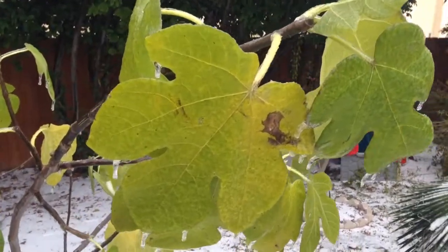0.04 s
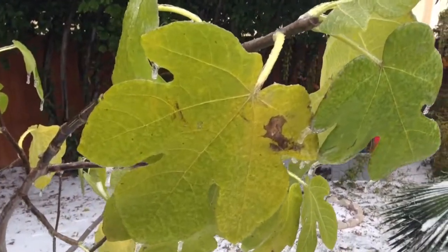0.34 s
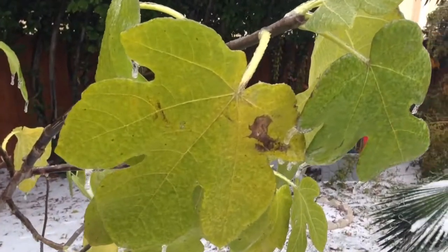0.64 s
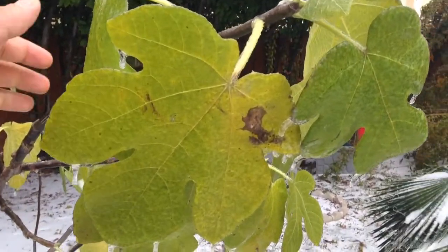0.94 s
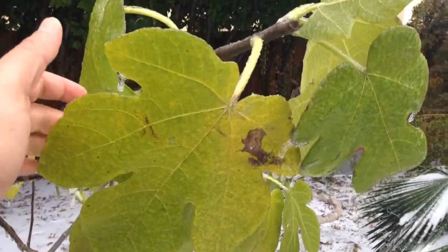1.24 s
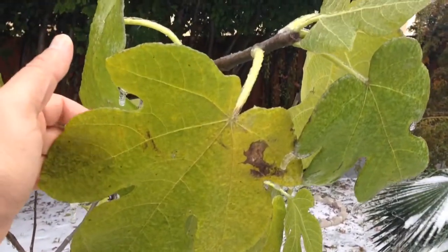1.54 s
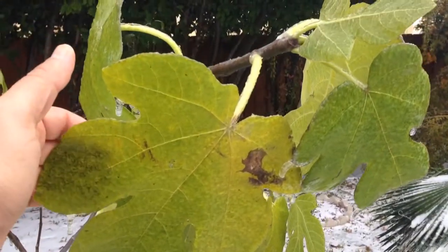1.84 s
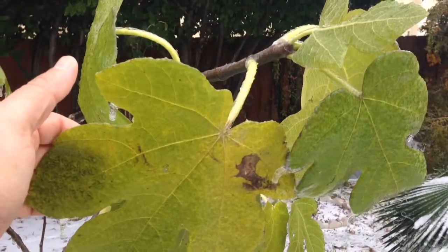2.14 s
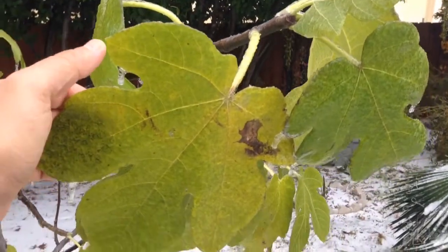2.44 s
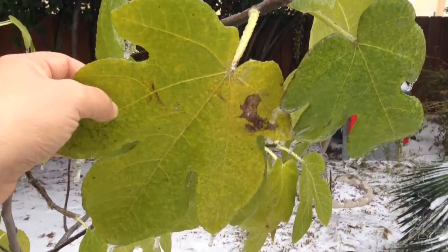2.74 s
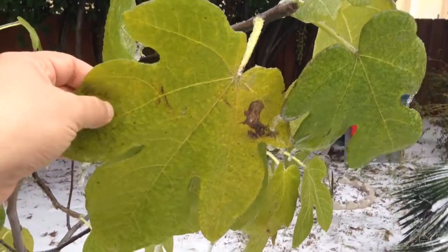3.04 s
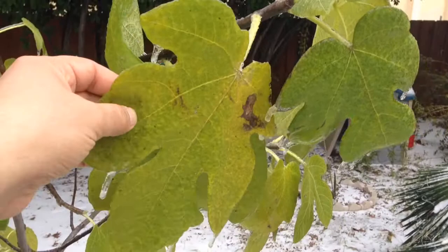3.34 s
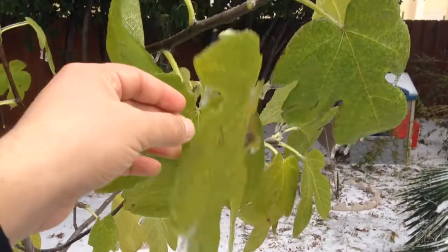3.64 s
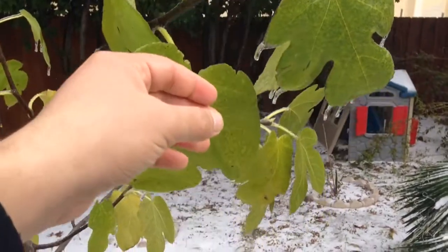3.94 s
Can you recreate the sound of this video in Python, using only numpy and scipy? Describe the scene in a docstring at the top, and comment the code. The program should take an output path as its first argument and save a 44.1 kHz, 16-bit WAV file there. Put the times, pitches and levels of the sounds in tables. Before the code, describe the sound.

A frozen leaf crackles close up as a hand bends it. At first there are only faint ticks and sleeve rustle over a quiet outdoor hiss and distant traffic. Sharp little cracks begin around 1.5 seconds, thickening from 2.1 seconds into brittle flurries with frosty crunching and soft flaps. A dense burst of cracks comes near 3.7 seconds, and the stalk snaps with a duller knock at 3.8.

```python
"""A frozen leaf crackles close up as a hand squeezes and bends it, outdoors in the cold.
Its ice glaze breaks in brittle cracks that ring the stiff blade, fine frost crunches under the fingers,
and the blade buckles with soft flaps. At the end the stalk snaps with a duller knock.
Underneath lie far traffic, an engine drone, a faint hiss of air, sleeve rustle and low handling bumps."""
import sys
import numpy as np
from scipy import signal
from scipy.fft import rfft, irfft
from scipy.io import wavfile

SR = 44100
rng = np.random.default_rng(int(sys.argv[2]) if len(sys.argv) > 2 else 0)


def generate_wav(sig):
    """Save sig (samples, or channels by samples) to the path in sys.argv[1] as 16-bit PCM at SR."""
    pcm = np.round(np.clip(np.atleast_2d(sig).T, -1, 1) * 32767).astype(np.int16)
    wavfile.write(sys.argv[1], SR, pcm)


N = 176400
CRACK_ATTACK_S = 0.0015


def amp(db):
    return 10 ** (np.asarray(db) / 20)


def along(points, hz):
    """Read (Hz, value) points on a log frequency axis."""
    point_hz, values = np.transpose(points)
    return np.interp(np.log(hz + 1), np.log(point_hz + 1), values)


def envelope(points):
    """A gain for every sample from (seconds, dB) points."""
    return amp(np.interp(np.arange(N) / SR, *np.transpose(points)))


def minimum_phase(gain, size):
    """A filter response with the given gain and no pre-ring."""
    cepstrum = irfft(np.log(np.maximum(gain, 1e-6)), size)
    cepstrum[1:size // 2] *= 2
    cepstrum[size // 2 + 1:] = 0
    return np.exp(rfft(cepstrum))


def coloured(x, tone):
    """x through an EQ curve of (Hz, dB) points, at rms 1."""
    shaped = irfft(rfft(x) * amp(along(tone, np.fft.rfftfreq(N, 1 / SR))), N)
    return shaped / np.sqrt(np.mean(shaped ** 2) + 1e-20)


def add(track, start_s, sound):
    """Mix a sound into the track."""
    part = track[max(0, round(start_s * SR)):][:len(sound)]
    part += sound[:len(part)]


def strength(x):
    """Rms of a short sound as if it lasted 5 ms."""
    return np.sqrt(np.sum(x ** 2) / (.005 * SR) + 1e-20)


def traffic():
    """Far traffic: a low rumble that slowly swells and eases."""
    # The rumble's swell. Each row: time in seconds, level in dB.
    levels = [(0, -63.5), (.6, -61.5), (.7, -56.5), (1.3, -55), (2.1, -53), (2.3, -59), (2.65, -58),
              (2.9, -60), (4, -57.5)]
    # Its bass-heavy tone. Each row: frequency in Hz, gain in dB.
    tone = [(20, -21), (50, -7.5), (75, -2.5), (105, -5), (165, 3.5), (210, -2.5), (280, -6), (450, -18.5),
            (900, -55), (3000, -80)]
    return envelope(levels) * coloured(rng.standard_normal(N), tone)


def engine():
    """A far engine drones in a narrow band of low noise."""
    # The drone's rise and fall. Each row: time in seconds, level in dB.
    levels = [(0, -67), (.6, -73), (.7, -51.5), (.9, -61.5), (1.05, -61.5), (1.35, -58.5), (1.55, -64.5),
              (1.75, -56), (2.15, -51), (2.3, -64), (2.6, -70), (2.9, -61), (4, -69.5)]
    # Its single hump. Each row: frequency in Hz, gain in dB.
    tone = [(60, -42), (125, -16.5), (163, -2), (195, -6), (260, -35.5), (500, -57)]
    return envelope(levels) * coloured(rng.standard_normal(N), tone)


def air():
    """The air hisses, faint and nearly steady."""
    # The drift of the hiss. Each row: time in seconds, level in dB.
    levels = [(0, -58), (.15, -59.5), (.5, -60), (.7, -61.5), (.85, -62), (1.3, -62), (1.7, -61),
              (2.1, -62), (3.6, -61), (4, -60.5)]
    # Its soft-topped tone. Each row: frequency in Hz, gain in dB.
    tone = [(240, 0), (400, -8), (602, -3.5), (1590, -10), (1770, -11), (2870, -12), (15000, -19.5)]
    return envelope(levels) * coloured(rng.standard_normal(N), tone)


def grains(tone, per_s, spread_db=2, t60=0.033):
    """Overlapping tiny noise bursts of random size, at rms 1."""
    onsets = rng.random(N) < per_s / SR
    energy = onsets * amp(spread_db * rng.standard_normal(N)) ** 2
    power = signal.lfilter([1], [1, -amp(-60 / (t60 * SR)) ** 2], energy)
    return coloured(np.sqrt(np.abs(power)) * rng.standard_normal(N), tone)


def rustle():
    """Hand and sleeve rustle in soft grains, reaching for the leaf."""
    # The hand's movement. Each row: time in seconds, level in dB.
    levels = [(0, -70), (.02, -49), (.032, -49), (.07, -56), (.12, -57), (.19, -74), (.3, -65), (.38, -64),
              (.5, -60), (.62, -61.5), (.7, -58), (.82, -68), (1.4, -76), (1.58, -62), (1.65, -62),
              (1.76, -61), (2, -108), (4, -78)]
    # The sleeve's tone. Each row: frequency in Hz, gain in dB.
    tone = [(150, 12), (600, -7), (2000, -6.5), (3300, -3), (5500, -4.5), (9000, -11.5), (15000, -17)]
    return envelope(levels) * grains(tone, per_s=450)


def volley(tone, t60, size=4096):
    """A fast-dying volley of tiny ruptures whose lows linger."""
    crossover_hz, low_attack_s, low_linger = 1620, 0.00042, 3.35
    high_hold_s, spikiness = 0.00061, 0.15
    t, hz = np.arange(size) / SR, np.fft.rfftfreq(size, 1 / SR)
    ruptures = rng.standard_normal((2, size)) * np.exp(spikiness * rng.standard_normal(size))
    high_decay = amp(-60 * np.maximum(t - high_hold_s, 0) / t60)
    high = ruptures[0] * (1 - np.exp(-t / CRACK_ATTACK_S)) * high_decay
    low = ruptures[1] * (1 - np.exp(-t / low_attack_s)) * amp(-60 * t / (t60 * low_linger))
    low_share = 1 / (1 + (hz / crossover_hz) ** 4)
    spectrum = 0
    for band, share in ((low, low_share), (high, 1 - low_share)):
        eq = minimum_phase(np.sqrt(share) * amp(along(tone, hz)), size)
        spectrum += rfft(band / strength(band)) * eq
    burst = irfft(spectrum)
    return burst / strength(burst)


def fracture(tone, modes, t60, ring_db, detune, size=4096):
    """A break: a volley of ruptures and the modes it rings, each at a slightly random pitch and level."""
    t = np.arange(size) / SR
    mode_hz, mode_db, mode_t60 = np.transpose(modes)[:, :, None]
    pitch_jitter, level_jitter, phase = rng.standard_normal((3, len(modes), 1))
    decays = amp(mode_db + 2.6 * level_jitter - 60 * t / mode_t60)
    partials = np.sin(2 * np.pi * (mode_hz * (1 + detune * pitch_jitter) * t + phase))
    ring = np.sum(decays * partials, axis=0) * (1 - np.exp(-t / CRACK_ATTACK_S))
    sound = volley(tone, t60) + amp(ring_db) * ring / strength(ring)
    return sound / strength(sound)


def crack(body_db, treble_db, body_hz=2160, treble_hz=6470):
    """One crack of ice rings the blade, its body and treble set against the mids."""
    # The bright tone of breaking ice. Each row: frequency in Hz, gain in dB.
    tone = [(100, -20.5), (220, -2.5), (450, -18), (750, -4), (1000, 0.5), (1200, -3), (1700, 1),
            (2700, -4), (3300, 7), (5500, 3.5), (9000, 1), (12000, -1.5), (15000, -3)]
    # The stiff blade's modes. Each row: frequency in Hz, level in dB, t60 in seconds.
    modes = [(767, -17.5, 0.027), (1009, -18.5, 0.033), (1734, -19, 0.055), (2363, -11.5, 0.04),
             (3070, -1, 0.017), (3368, -18, 0.061), (3660, -8, 0.026), (4800, -10.5, 0.039),
             (6680, -23, 0.0095), (8620, -4, 0.0073), (11020, -4.5, 0.0059)]
    sound = fracture(tone, modes, t60=0.015, ring_db=-6, detune=0.0465)  # bending shifts the modes
    spectrum, hz = rfft(sound), np.fft.rfftfreq(len(sound), 1 / SR)
    body, below_treble = (1 / (1 + (hz / edge) ** 8) for edge in (body_hz, treble_hz))
    log_gain = 0
    for share, db in ((body, body_db), (below_treble - body, 0), (1 - below_treble, treble_db)):
        band = irfft(spectrum * np.sqrt(np.abs(share)))
        log_gain += share * np.log(amp(db) / strength(band))
    return irfft(spectrum * minimum_phase(np.exp(log_gain), len(sound)))


def glaze(trim_db=-4):
    """The ice glaze cracks as the leaf bends: a few stray clicks, then flurries."""
    # The cracks. Each row: start in seconds, level of the mids in dB before the trim,
    # body over the mids in dB, treble over the mids in dB.
    cracks = [(0.0283, -41, -9, -5), (0.047, -45.5, -21, -6.5), (0.4235, -54, -10, -1),
              (0.4879, -48.5, -3, -10.5), (1.467, -40, -24, 2), (1.4714, -33.5, -17, 1),
              (1.4867, -43, -11, 6), (1.5494, -49, -17, -0.5), (1.6168, -53, -3, -7),
              (1.639, -51.5, -27, -7), (1.7176, -55, 0, 3), (1.7839, -32, -20.5, -0.5),
              (1.8312, -29.5, -9.5, 3.5), (1.8468, -27, -14, 5), (1.8774, -43.5, -23, -10),
              (1.9228, -48.5, -9, 11.5), (1.962, -58, -2, 7), (1.9748, -43, -24, 6.5),
              (2.1387, -46, -15, -1), (2.1524, -22.5, -10.5, 0), (2.1686, -26.5, -19, 9),
              (2.1716, -17.5, -6.5, -3), (2.1762, -23, -5.5, 10), (2.2664, -30, -6, 6),
              (2.3027, -27.5, -11, 5.5), (2.3125, -42.5, 5, 12), (2.3188, -27, -3.5, 5),
              (2.3446, -33, -10.5, 4), (2.3729, -40, -13, 7.5), (2.3917, -25.5, -9.5, 1.5),
              (2.418, -44.5, -13, 7), (2.4464, -47.5, -24, 7), (2.4749, -40.5, -18, 2.5),
              (2.4836, -38, -23, 4), (2.4919, -40, -16, 4), (2.507, -46.5, -18, 12), (2.5343, -45.5, -8, 5),
              (2.56, -46, -20, 10), (2.567, -47, -12, 8), (2.5783, -26.5, -15.5, 4.5),
              (2.615, -51, -14, 13.5), (2.6475, -42.5, -23, 1.5), (2.6547, -49, -27, 12.5),
              (2.6673, -49, -23, 8), (2.7032, -34.5, -17.5, 8), (2.7493, -49, -25, 6),
              (2.7822, -50.5, -9, 9), (2.7994, -20, -8, 0.5), (2.858, -44.5, 0.5, 3), (2.872, -46, -13, 11),
              (2.9231, -45.5, -19, 11), (2.929, -32.5, -17.5, 5.5), (3.003, -48.5, -15, 4),
              (3.0194, -29, -16, 2), (3.0326, -40.5, -11, 2), (3.103, -44, -20, 2), (3.146, -41, -1.5, 8),
              (3.1794, -33.5, -10, 8), (3.221, -22.5, -2.5, 0), (3.4318, -18.5, -11.5, -8),
              (3.4508, -40, -8, 2), (3.5053, -27, -18, 1.5), (3.612, -34, -16, 3), (3.6284, -34, -9.5, -3),
              (3.6436, -34, -1, 0), (3.6688, -24, -3.5, 5), (3.6754, -17.5, -15, -5),
              (3.6805, -17.5, -15, -7.5), (3.6847, -21.5, -10, -15), (3.6886, -22.5, -22, -1),
              (3.6914, -28.5, -4, 7), (3.6986, -24.5, -9.5, -2), (3.8355, -45.5, 3, 0.5)]
    out = np.zeros(N)
    for start, db, body_db, treble_db in cracks:
        add(out, start, amp(db + trim_db) * crack(body_db, treble_db))
    return out


def handling_bumps(width_s=0.033):
    """Handling makes soft, short swells of bass."""
    # The bumps. Each row: centre in seconds, level in dB.
    bumps = [(.16, -53), (.37, -53), (.5, -53), (2.54, -55)]
    # Their deep tone. Each row: frequency in Hz, gain in dB.
    tone = [(20, -9), (50, 19), (85, 12), (140, -1), (400, -63)]
    t = np.arange(N) / SR
    swells = sum(amp(db) * np.exp(-((t - centre) / width_s) ** 2) for centre, db in bumps)
    return swells * coloured(rng.standard_normal(N), tone)


def ticks(count=2, window_s=(1.9, 2), level_db=-62.5, spread_db=6):
    """The held leaf gives faint cracks at random moments."""
    out = np.zeros(N)
    for _ in range(count):
        start = rng.uniform(*window_s)
        gain = amp(level_db + spread_db * rng.normal())
        add(out, start, gain * crack(body_db=-6, treble_db=-3.5))
    return out


def frost_crunch(trim_db=-4):
    """Dense grains of frost, louder as the fingers press and slide."""
    # The squeezes. Each row: time in seconds, level in dB before the trim.
    levels = [(2.165, -79), (2.2, -39), (2.28, -41), (2.345, -35.5), (2.365, -57), (2.44, -59), (2.76, -59),
              (2.85, -51), (2.9, -57), (3.135, -56.5), (3.155, -40.5), (3.21, -38), (3.26, -48.5),
              (3.38, -51.5), (3.41, -54), (3.495, -47), (3.55, -52.5), (3.6, -60), (3.65, -40.5),
              (3.705, -29), (3.73, -62), (3.78, -68), (3.85, -74)]
    # The frost's crisp tone. Each row: frequency in Hz, gain in dB.
    tone = [(150, -28), (500, -5), (850, -20), (1200, -10.5), (2500, -3.5), (3300, -1), (5000, -0.5),
            (7000, -1.5), (12000, -0.5), (15000, -8.5)]
    return amp(trim_db) * envelope(levels) * grains(tone, per_s=1200)


def blade_flaps():
    """The blade buckles with a soft flap under some of the biggest cracks."""
    # The buckles. Each row: start in seconds, level in dB.
    flaps = [(2.17, -48), (2.799, -44), (3.223, -40.5), (3.432, -48)]
    # Their low, muffled tone. Each row: frequency in Hz, gain in dB.
    tone = [(80, -22), (180, 12), (320, 13.5), (600, 6.5), (1000, -6), (2500, -38)]
    out = np.zeros(N)
    for start, db in flaps:
        add(out, start, amp(db) * volley(tone, t60=0.021))
    return out


def stalk_snap():
    """The frozen stalk breaks in four quick steps that merge into a knock."""
    # The fibres giving way. Each row: start in seconds, level in dB.
    snaps = [(3.7934, -21.5), (3.8015, -31.5), (3.8095, -28), (3.8171, -37.5)]
    # The break's duller tone. Each row: frequency in Hz, gain in dB.
    tone = [(100, -15.5), (250, -11.5), (520, -13.5), (1000, 3), (1500, -6.5), (2100, -10), (4000, -8),
            (5500, -22.5), (9000, -28), (15000, -36)]
    # The stalk's modes. Each row: frequency in Hz, level in dB, t60 in seconds.
    modes = [(525, -4.5, 0.089), (913, -1, 0.044), (1469, 9, 0.029), (1715, 2, 0.062), (2500, 1, 0.044),
             (3920, -7.5, 0.057)]
    out = np.zeros(N)
    for start, db in snaps:
        add(out, start, amp(db) * fracture(tone, modes, t60=0.018, ring_db=-3.5, detune=0.0061))
    return out


def echoes(x, t60, pieces=20):
    """Scattered reflections, with a fresh tail for each stretch of sound as hand and leaves move."""
    t, out = np.arange(SR // 3) / SR, np.zeros(N)
    fade_in = 1 - np.exp(-(t / 0.01) ** 2)
    for k, piece in enumerate(np.array_split(x, pieces)):
        tail = rng.standard_normal(len(t)) * amp(-60 * t / t60) * fade_in
        add(out, k * N / pieces / SR, signal.fftconvolve(piece, tail / np.linalg.norm(tail)))
    return out


def scene():
    """The leaf and its echoes over a quiet outdoor bed, in mono."""
    bed = traffic() + engine() + air() + handling_bumps() + rustle()
    leaf = frost_crunch() + stalk_snap() + blade_flaps() + glaze()
    near = amp(-17.5) * echoes(leaf, t60=0.043)  # off the hand and leaves
    yard = amp(-24) * echoes(leaf, t60=0.34)
    return (leaf + near + yard + bed + ticks())[None]


def record(dry, top_hz=15400):
    """A steep low-pass takes off the very top."""
    hz = np.fft.rfftfreq(N, 1 / SR)
    return irfft(rfft(dry) / np.sqrt(1 + (hz / top_hz) ** 160), N)


dry = scene()
out = record(dry)
generate_wav(out)
```